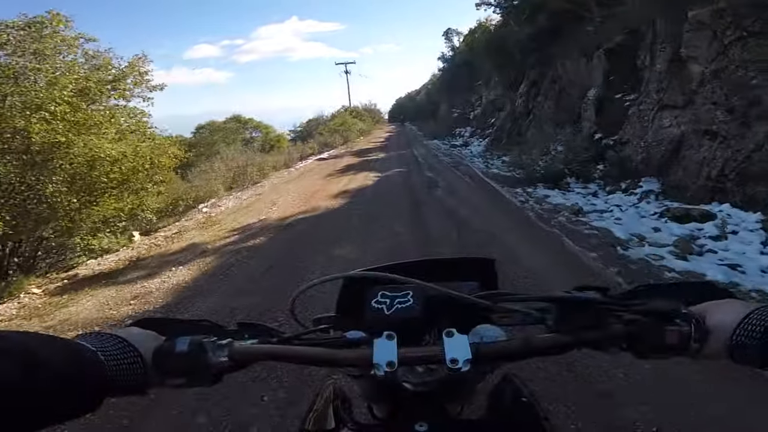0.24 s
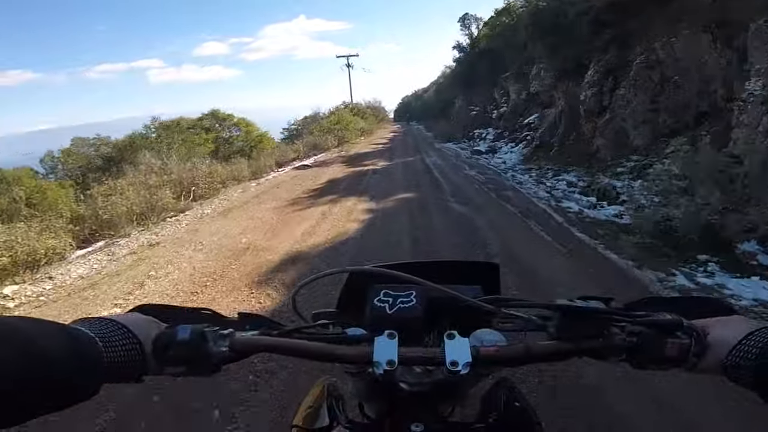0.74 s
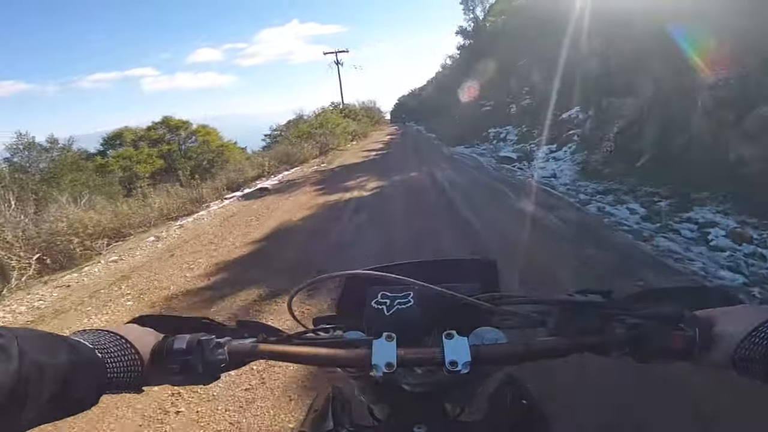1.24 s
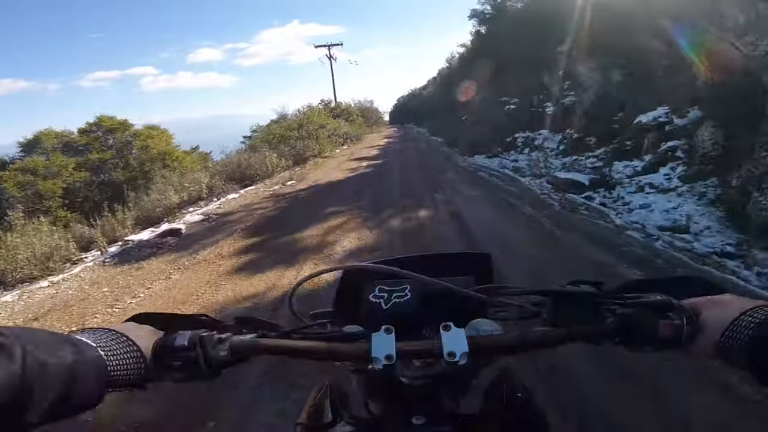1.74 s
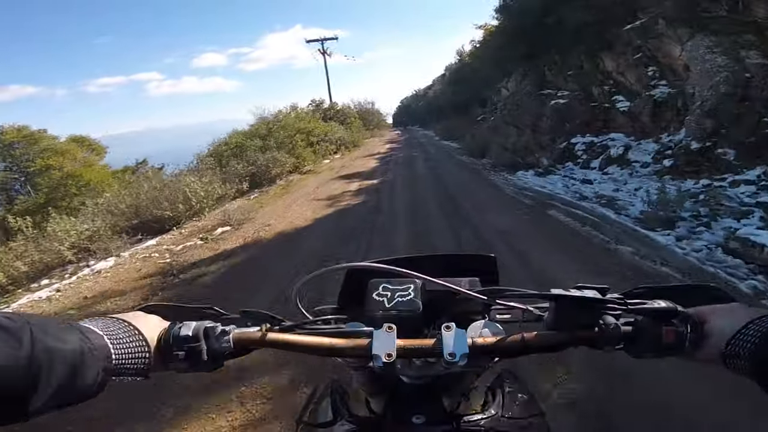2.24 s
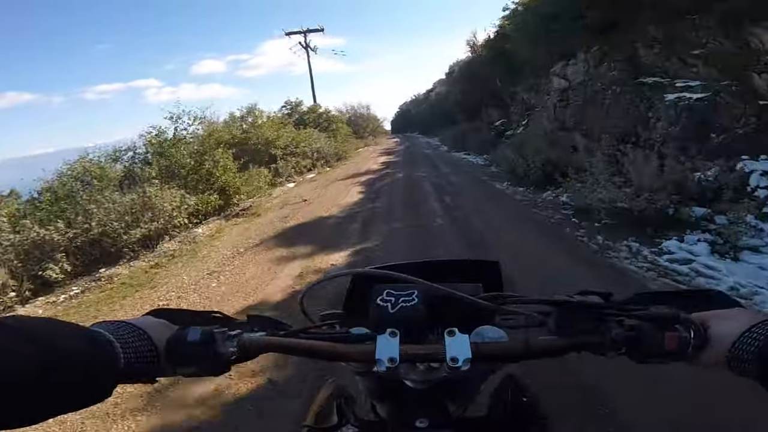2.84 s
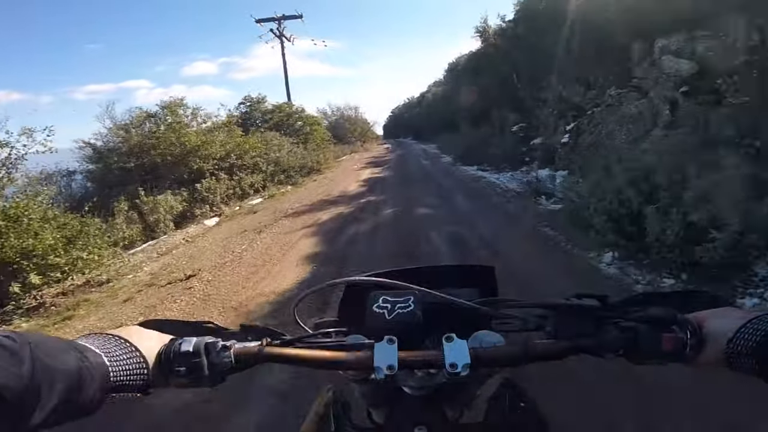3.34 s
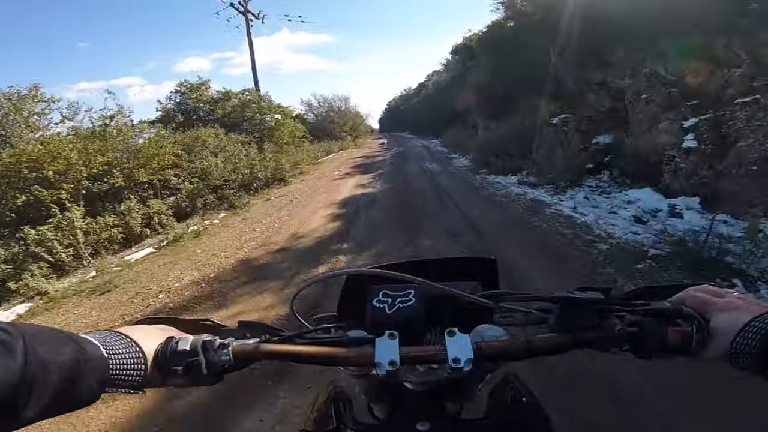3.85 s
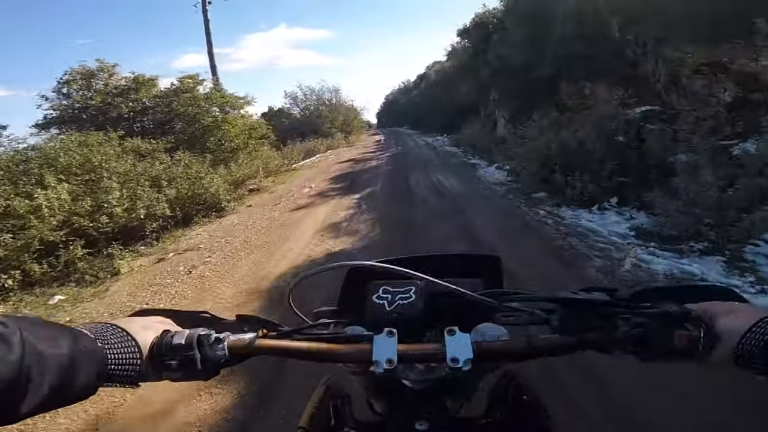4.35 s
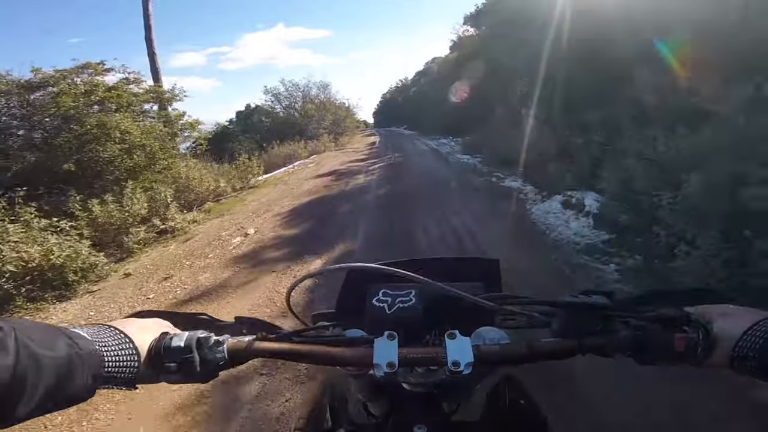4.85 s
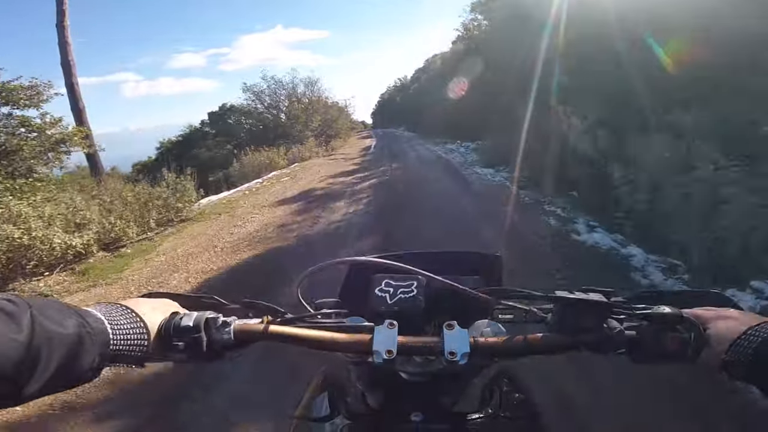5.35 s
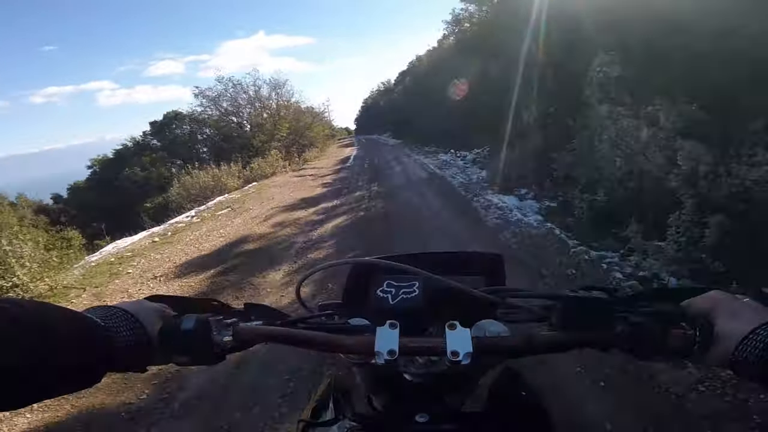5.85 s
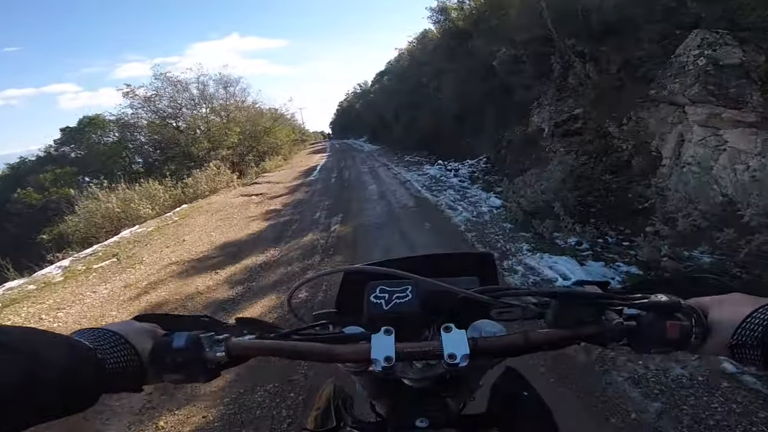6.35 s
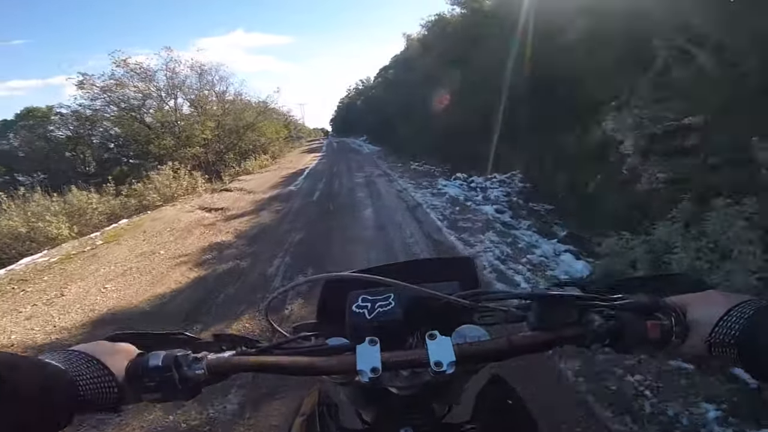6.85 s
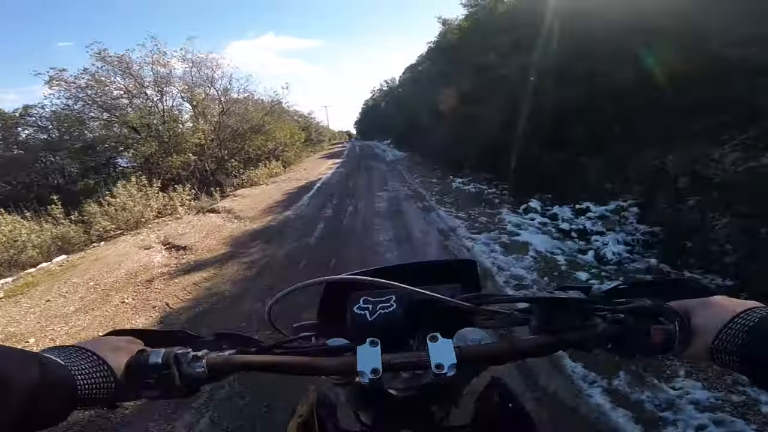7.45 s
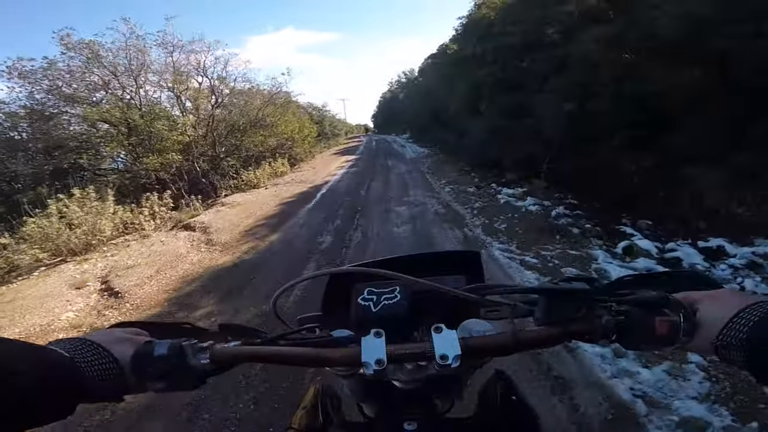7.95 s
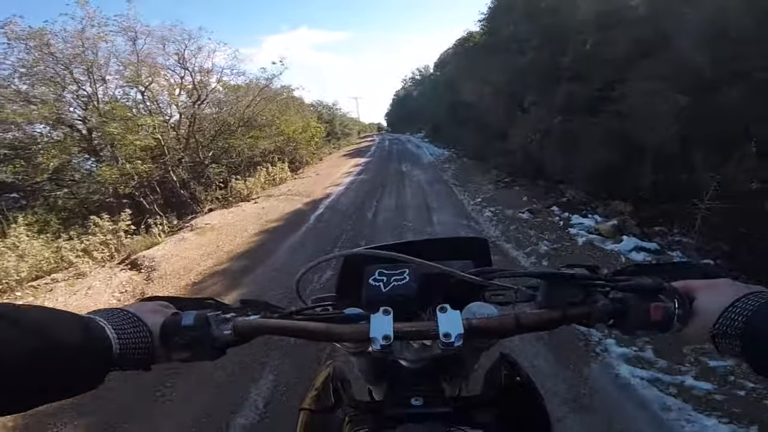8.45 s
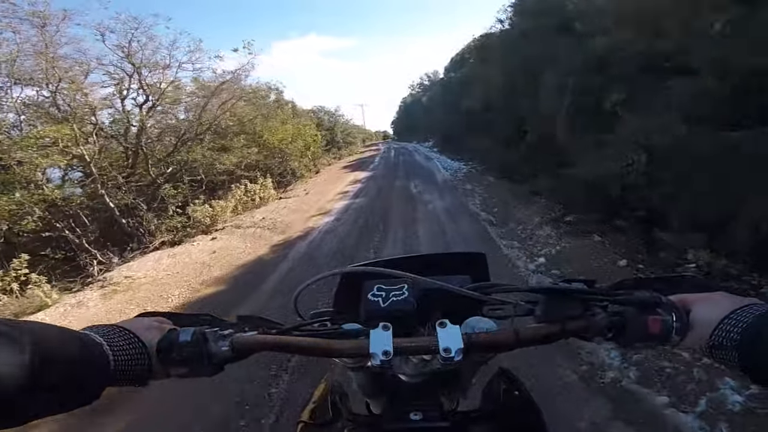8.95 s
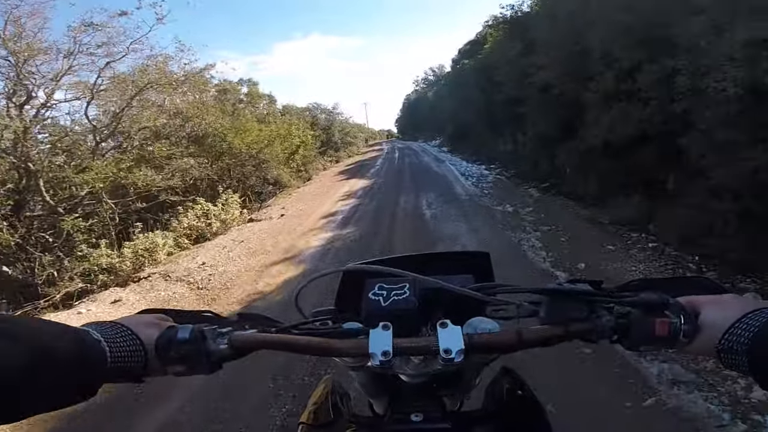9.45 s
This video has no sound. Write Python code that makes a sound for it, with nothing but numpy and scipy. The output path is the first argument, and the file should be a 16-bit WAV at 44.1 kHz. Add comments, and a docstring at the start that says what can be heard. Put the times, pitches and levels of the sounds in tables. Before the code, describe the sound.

A dirt bike on an open gravel road, heard from a microphone on the rider. Fast bassy exhaust thuds dominate, with dry mechanical clatter, hiss and low wind and tyre rumble beneath. Mid-way the engine sags to a slow irregular thump, chain slap and stone knocks appear, short bursts of throttle lift it, and it ends pulling strongly with brief metallic rattles.

```python
"""A four-stroke single dirt bike chugs along a gravel road at low revs, heard from on the rider.
Each firing booms as the silencer gas swings and, throttle open, barks in the pipe; off it, firing is uneven.
Noise shaped by the crank angle makes the exhaust rush, air box growl, machinery, cams and panel drone.
Gears whine as a modulated tone; impulses ring as valve ticks, chain slap and loose metal; short noise
bursts make the stones. Filtered noise makes the tyre and wind rumble; two limiters hold the peaks level."""
import sys
import numpy as np
from scipy import signal
from scipy.fft import rfft, irfft
from scipy.io import wavfile
from scipy.ndimage import uniform_filter1d, minimum_filter1d

SR = 44100
rng = np.random.default_rng(int(sys.argv[2]) if len(sys.argv) > 2 else 0)


def waveform_to_disk(signal):
    """Save audio, clipped to [-1, 1], as 16-bit WAV at the path in sys.argv[1]."""
    frames = np.transpose(np.atleast_2d(signal))
    scaled = np.clip(frames, -1, 1) * 32767
    samples = np.round(scaled).astype(np.int16)
    wavfile.write(sys.argv[1], SR, samples)


N = 428211
TIME = np.arange(N) / SR
CRUISE_RATE = 19  # firings per second, one per engine cycle
# engine speed: (time [s], rate [firings per second])
ENGINE_SPEED = [(0.0, 19.22), (0.25, 19.75), (0.52, 19.42), (0.83, 18.92), (1.3, 19.09), (1.55, 18.74),
                (1.8, 19.28), (2.93, 19.7), (3.24, 18.71), (3.88, 18.3), (4.53, 14.94), (5.16, 13.29),
                (5.68, 13.05), (6.15, 10.41), (6.41, 15.31), (6.84, 11.98), (7.11, 11.32), (7.58, 15.02),
                (7.99, 14.49), (8.26, 17.43), (8.42, 15.91), (9.71, 20.82)]
# throttle, as the strength of the firings before the bark's own gain: (time [s], level [dB])
THROTTLE_LEVEL = [(0.0, -8), (0.55, -14.5), (1.35, -11.5), (1.8, -4), (2.35, -2.5), (3.05, -3.5),
                  (3.25, -12.5), (3.9, -13.5), (5.05, -18.5), (5.55, -11), (6.02, -18), (6.38, -5.5),
                  (6.65, -15), (7.8, -11.5), (8.25, -3.5), (8.45, -5), (9.0, -2.5), (9.71, -2.5)]


def undb(db):
    """Decibels to gain."""
    return 10 ** (np.asarray(db) / 20)


def curves(table, at=TIME):
    """The columns of a table, joined by straight lines in time."""
    s, *columns = np.transpose(table)
    return [np.interp(at, s, column) for column in columns]


def unit(x):
    """Scale to rms 1."""
    return x / np.sqrt(np.mean(x ** 2))


def colour(x, spectrum):
    """Filter by (frequency [Hz], level [dB]) points; rms 1."""
    hz, db = np.transpose(spectrum)
    bins = np.maximum(np.arange(N // 2 + 1) * SR / N, 1)
    gain = undb(np.interp(np.log(bins), np.log(hz), db))
    return unit(irfft(rfft(x) * gain, N))


def band(x, lo_hz, hi_hz):
    """Keep one band."""
    return signal.sosfilt(signal.butter(3, [lo_hz, hi_hz], "bandpass", fs=SR, output="sos"), x)


def walk(rate):
    """Slow chance with a spread near 1, from smoothed steps at a rate in Hz."""
    step = int(SR / rate)
    steps = np.repeat(rng.standard_normal(N // step + 1), step)
    return unit(uniform_filter1d(steps, step)[:N])


def clicks(times, sizes):
    """One impulse at each time."""
    places = np.clip(np.asarray(times) * SR, 0, N).astype(int)
    return np.bincount(places, sizes, N + 1)[:N]


def ring(x, modes):
    """Drive a set of damped modes."""
    t = TIME[:SR // 2]
    response = sum(undb(db) * np.exp(-np.pi * width * t) * np.sin(2 * np.pi * hz * t)
                   for hz, width, db in modes)
    return signal.fftconvolve(x, response)[:N]


def bursts(times, sizes, decay_s):
    """Noise that jumps up at each time and dies away."""
    envelope = signal.lfilter([1], [1, -np.exp(-1 / (decay_s * SR))], clicks(times, sizes))
    return envelope * rng.standard_normal(N)


def add(out, start_s, sound):
    """Mix a sound in at a time."""
    i = min(max(int(start_s * SR), 0), N)
    out[i:i + len(sound)] += sound[:N - i]


def lobe(cycles, centre, width):
    """A smooth swell at one place in every engine cycle."""
    distance = (cycles - centre + .5) % 1 - .5
    return np.exp(-.5 * (distance / width) ** 2)


def tap(cycles, start, fade):
    """A sudden tap at one place in every engine cycle, dying away."""
    return np.exp(-((cycles - start) % 1) / fade)


def shake(cycles, repeat, size=1024):
    """Engine vibration: one share repeats with the crank angle, the rest is new in every cycle."""
    share = np.clip(repeat, 0, 1)
    pattern = np.interp(cycles % 1, np.linspace(0, 1, size), rng.standard_normal(size))
    return np.sqrt(share) * pattern + np.sqrt(1 - share) * rng.standard_normal(N)


def moments(cycles, place):
    """The times at which each engine cycle reaches one place."""
    return np.interp(np.arange(int(cycles[-1])) + place, cycles, TIME)


def octaves(at=TIME):
    """Engine speed in octaves above cruising."""
    return np.log2(curves(ENGINE_SPEED, at)[0] / CRUISE_RATE)


def opening(strength_db, shut_db=-13, wide_db=0.0):
    """How far the throttle is open, 0-1."""
    return np.clip((strength_db - shut_db) / (wide_db - shut_db), 0, 1)


def boom(times, hz=55.28, shut_glide_hz=10, open_glide_hz=54, glide_s=0.018, rise_s=0.0021,
         shut_width=8.1, open_width=6.3, shut_db=-3.5, open_db=-4.5, scatter_db=3.0,
         jitter_s=0.00045, puff=0.45, puff_s=0.0038, lag_s=0.0014, choke_s=0.016):
    """A puff sets the silencer gas swinging; throttle open, it starts higher and sinks; the next puff chokes it."""
    # slow cycles take in more gas, so each boom is bigger; far more so with the throttle open
    boom_db_per_octave, lug_db_per_octave = -4, -9
    out, t = np.zeros(N), TIME[:SR // 4]
    flows = opening(curves(THROTTLE_LEVEL, times)[0])
    charges_db = (boom_db_per_octave + flows * lug_db_per_octave) * octaves(times)
    periods = 1 / curves(ENGINE_SPEED, times)[0]
    luck = rng.standard_normal((len(times), 2))
    for s, period, flow, charge_db, (early, strong) in zip(times, periods, flows, charges_db, luck):
        uneven = 1 - flow  # a shut throttle burns less evenly
        glide_hz = shut_glide_hz + flow * (open_glide_hz - shut_glide_hz)
        turns = hz * t + glide_hz * glide_s * (1 - np.exp(-t / glide_s))
        width = shut_width + flow * (open_width - shut_width)
        level_db = shut_db + flow * (open_db - shut_db) + charge_db + scatter_db * uneven * strong
        size = undb(level_db)
        swing = (1 - np.exp(-t / rise_s)) * np.exp(-np.pi * width * t) * np.sin(2 * np.pi * turns)
        swing = swing * np.exp(-np.maximum(t - period, 0) / choke_s)
        start = s + uneven * (lag_s - jitter_s * early)
        push = np.sin(np.pi * np.minimum(t / puff_s, 1)) ** 2
        add(out, start - puff_s, size * uneven * puff * push)
        add(out, start, -size * swing)
    return out


def firings(times, scatter_db=1.9, rebound=0.39):
    """Times and strengths of the barks: shut throttle scatters them more, and weak ones tend to precede strong."""
    # single firings that catch out of step: (time [s], level [dB])
    bangs = [(0.046, -6.5), (0.25, -9), (0.46, -10), (0.665, -7), (1.035, -11), (1.246, -1), (1.562, -6.5),
             (3.162, -6.5), (3.272, -7.5), (3.379, -7.5), (3.429, -7.5), (3.536, -9), (3.595, -9),
             (3.699, -10.5), (3.751, -12.5), (3.915, -5), (3.975, -11.5), (4.146, -5.5), (4.208, -8.5),
             (4.332, -10), (4.724, -5), (4.94, -15), (5.16, -12.5), (5.383, -13.5), (5.614, -10.5),
             (5.77, -10.5), (5.85, -10.5), (6.208, -12), (6.711, -7.5), (7.373, -6), (7.447, -8),
             (7.583, -7)]
    times, strength_db = times.copy(), curves(THROTTLE_LEVEL, times)[0]
    luck = rng.standard_normal(len(times))
    swings = luck - rebound * np.roll(luck, 1)
    strength_db = strength_db + scatter_db * swings * (1.5 - opening(strength_db))
    for s, db in bangs:
        nearest = np.argmin(abs(times - s))
        times[nearest], strength_db[nearest] = s, db
    return times, strength_db


def bark(times, strength_db, push_s=0.0033, db=4):
    """The exhaust valve lets out a rounded push of gas that rings the pipe."""
    # exhaust pipe modes: (frequency [Hz], width [Hz], relative level [dB])
    pipe = [(125, 16, -21), (243.7, 32.3, -4.5), (273, 35.6, -2.5), (318, 49, -12.5), (463, 50, -15.5)]
    push = np.sin(np.pi * np.minimum(TIME[:SR // 100] / push_s, 1)) ** 2
    impulses = clicks(times - push_s / 2, undb(strength_db + db))
    pulses = signal.fftconvolve(impulses, push / push.sum())[:N]
    return ring(pulses, pipe)


def rush(cycles, load, db=-31.5, load_db=5.0):
    """Spent gas tumbles out of the pipe: low noise that swells and fades once a cycle, louder under load."""
    eddies = shake(cycles, repeat=0.6)
    gusts = band(eddies, 145.6, 330) * lobe(cycles, centre=0.23, width=0.2)
    return unit(gusts) * undb(db + load_db * load)


def growl(cycles, revs, load, db=-41.0, db_per_octave=9, load_db=4.5):
    """The air box growls twice in every cycle, most when the engine pulls at speed."""
    # resonances of the air box: (frequency [Hz], width [Hz], relative level [dB])
    airbox = [(502, 66, 3.5), (630, 84, 3.5), (711, 80, 2)]
    gulps = lobe(cycles, centre=0.27, width=0.052) + 0.73 * lobe(cycles, centre=0.622, width=0.064)
    air = band(shake(cycles, repeat=0.26) * gulps, 416, 864)
    return unit(ring(air, airbox)) * undb(db + db_per_octave * revs + load_db * load)


def machinery(cycles, case_db, hiss_db, barrel_db):
    """The piston slaps the barrel after each firing; the valve gear hisses twice a cycle."""
    # spectrum of the engine cases: (frequency [Hz], relative level [dB])
    case_spectrum = [(500, -6.5), (900, -2.5), (1100, -2), (1220, -3.5), (1310, 0.5), (1400, -12.5),
                     (1520, -5), (1660, -5.5), (1900, -12.5), (2250, -8), (2700, -13.5), (3300, -18),
                     (3700, -18), (6000, -20), (12000, -82)]
    # spectrum of the hiss as recorded, with the recorder's step down above 11 kHz:
    # (frequency [Hz], relative level [dB])
    hiss_spectrum = [(1500, -18), (3350, 2), (3750, -12), (4100, -3), (4600, -1.5), (5150, 3), (6400, -0.5),
                     (7300, -4.5), (7900, -2.5), (8600, -4), (10300, -6), (11200, -14.5), (12000, -27.5),
                     (13600, -14.5), (15000, -38)]
    # ring of the cylinder barrel: (frequency [Hz], width [Hz], relative level [dB])
    barrel_modes = [(1247, 28, 4.5), (1399, 50, 9.5), (1550, 72, 1.5), (1663, 85, 2)]
    exhaust, intake = tap(cycles, start=0.25, fade=0.11), tap(cycles, start=0.63, fade=0.025)
    slap, chain = lobe(cycles, centre=0.19, width=0.083), lobe(cycles, centre=0.65, width=0.069)
    gritty = rng.standard_normal(N) * undb(1.9 * walk(700) + 1.0 * walk(25))
    hiss = colour(gritty * (0.63 + 1.23 * exhaust + 0.49 * intake + 0.49 * chain), hiss_spectrum)
    case_shake = shake(cycles, repeat=0.067) * (1 + 0.075 * slap)
    cases = colour(case_shake * undb(1.17 * walk(90)), case_spectrum)
    barrel = unit(ring(shake(cycles, repeat=0.051) * (0.17 + slap + 0.47 * chain), barrel_modes))
    clatter = (cases + barrel * undb(barrel_db)) * undb(case_db)
    return hiss * undb(hiss_db) + clatter


def valves(cycles, revs, tick_db, scatter_db=2.5, jitter_s=0.0003):
    """The intake valve seats and rebounds, ringing the head; engine speed shifts the balance of its modes."""
    # ring of the head: (frequency [Hz], width [Hz], relative level [dB], change with speed [dB per octave])
    head = [(4023, 38, 3, 3.5), (4290, 63, 1, -8), (4385, 65, -3.5, -6.5), (4600, 120, -8, -6),
            (5060, 42, 0.5, 8)]
    # ticks of the intake valve: (place in the cycle [0-1], relative level [dB])
    tick_places = [(0.555, 3.5), (0.6, 0), (0.68, -5.5)]
    times = np.concatenate([moments(cycles, place) for place, db in tick_places])
    luck, late = rng.standard_normal((len(times), 2)).T
    levels_db = np.repeat([db for place, db in tick_places], int(cycles[-1]))
    ticks = clicks(times + jitter_s * late, undb(levels_db + scatter_db * luck))
    rung = sum(ring(ticks, [mode]) * undb(db_per_octave * revs) for *mode, db_per_octave in head)
    return unit(rung) * undb(tick_db)


def cams(cycles, cover_db):
    """The two cam lobes rub their rockers in turn and make the valve cover sing."""
    # ring of the valve cover: (frequency [Hz], width [Hz], relative level [dB])
    cover = [(2610, 39, 0), (2780, 35, -1.5), (2840, 34, -1.5), (5400, 98, -7), (6750, 93, -0.5),
             (7930, 110, 1)]
    lift = 0.59 + lobe(cycles, centre=0.27, width=0.066) + 0.8 * lobe(cycles, centre=0.71, width=0.047)
    rubbing = shake(cycles, repeat=0.25)
    return unit(ring(rubbing * lift, cover)) * undb(cover_db)


def gears(cycles, load, teeth=62, db=-60.5, ring_db=-48.0, load_db=0.0, flutter_db=1.1):
    """Meshing teeth, loaded twice a cycle, whine, and the case sings along when they near its modes."""
    # modes of the gear case: (frequency [Hz], width [Hz], relative level [dB])
    gear_case = [(846, 94, 0), (1226, 46, -2.5)]
    # the crank speeds up and slows within each cycle, and wanders a little
    turn = cycles + 0.012 * np.sin(2 * np.pi * cycles) / (2 * np.pi) + 0.0009 * walk(30)
    pressure = 0.35 + lobe(cycles, centre=0.19, width=0.094) + lobe(cycles, centre=0.83, width=0.17)
    flutter = undb(flutter_db * walk(20) + 1.0 * walk(4.2))
    mesh = unit(np.sin(2 * np.pi * teeth * turn) * pressure * flutter)
    return mesh * undb(db) + unit(ring(mesh, gear_case)) * undb(ring_db + load_db * load)


def chain_slap(middle_s=6.08, half_s=0.42, db=-38.5, scatter_db=1.2):
    """For one stretch the slack chain drums on its guide at a slowly rising rate, swelling and fading."""
    # modes of the chain guide: (frequency [Hz], width [Hz], relative level [dB])
    guide = [(452, 19, 3), (530, 41, 1), (590, 46, -16)]
    middle_rate, rise_per_s = 41.3, 2.2  # knocks per second at the middle, and how fast that rises
    rate = middle_rate + rise_per_s * (TIME - middle_s) + 0.15 * walk(10)
    times = moments(np.cumsum(rate) / SR, 0)
    hits = clicks(times, undb(scatter_db * rng.standard_normal(len(times))))
    knocks = ring(band(hits, 340, 1100), guide)
    return unit(knocks) * np.exp(-((TIME - middle_s) / half_s) ** 2) * undb(db)


def drone(cycles):
    """The engine shakes the panels, swelling twice a cycle: just after the firing and a third of a cycle on."""
    # modes of the tank and side panels: (frequency [Hz], width [Hz], relative level [dB])
    panels = [(463, 49, 9.5), (508, 34, -1)]
    # course of the drone, before a fixed trim: (time [s], level [dB])
    drone_level = [(0.0, -32), (1.1, -34.5), (1.6, -29), (3.0, -28), (4.6, -36), (5.6, -32.5), (6.15, -29),
                   (6.5, -31), (6.75, -49), (7.8, -48), (8.7, -48), (9.3, -27), (9.71, -28.5)]
    jolts = 0.59 + lobe(cycles, centre=0.027, width=0.07) + 0.7 * lobe(cycles, centre=0.33, width=0.055)
    vibration = shake(cycles, repeat=0.7)
    hum = unit(ring(band(vibration * jolts, 377, 770), panels))
    return hum * undb(curves(drone_level)[0] - 3.5)


def rattles():
    """Jolts make loose metal chatter and ring; stones knock on the frame as short bursts of noise."""
    # jolts: (time [s], relative level [dB], ring relative to that [dB])
    jolts = [(0.0717, -43, -18), (0.158, -40, -21), (0.2079, -45, -14), (3.1887, -43, -19),
             (3.4386, -40, -21), (4.071, -40, -19), (4.6214, -42, -21), (6.1275, -43, -26),
             (9.2549, -41, -8), (9.289, -37, -15), (9.3144, -45, -10), (9.5786, -42, -15)]
    # modes of the loose metal: (frequency [Hz], width [Hz], relative level [dB])
    metal_modes = [(9947, 22, 0), (10334, 24, -2), (13667, 30, -14), (14052, 26, -15)]
    # stones: (time [s], relative level [dB], decay [s])
    stones = [(1.064, -25, .004), (3.063, -23, .004), (3.645, -26, .02), (4.186, -25, .005),
              (5.873, -25, .005), (6.125, -33, .03), (6.197, -27, .004), (6.221, -23.5, .007),
              (6.272, -29, .008), (6.392, -32, .03)]
    s, db, ring_db = np.transpose(jolts)
    bright = signal.butter(2, [5500, 10500], "bandpass", fs=SR, output="sos")
    chatter = signal.sosfilt(bright, bursts(s, undb(db + 5.5), decay_s=0.019))
    metal = ring(clicks(s, undb(db + ring_db + 11.5)), metal_modes)
    grit = sum(bursts([at], undb([stone_db + 6]), decay_s) for at, stone_db, decay_s in stones)
    knocks = band(grit, 600, 1900)
    return chatter + metal + knocks


def road(road_db):
    """Tyres rumble over gravel, with wind buffeting underneath: one coloured noise of wavering level."""
    # spectrum of the rumble: (frequency [Hz], relative level [dB])
    road_spectrum = [(20, 2), (42, 11), (100, 3), (150, -5), (290, -8), (385, -16.5), (470, -13.5),
                     (620, -18.5), (800, -22), (1100, -38.5), (2000, -37), (5000, -71), (15000, -87)]
    return colour(rng.standard_normal(N) * undb(2.06 * walk(30)), road_spectrum) * undb(road_db)


def swells():
    """Level changes in dB, rounded in time, where the clatter, hiss and barrel ring swell or sink."""
    # swells and sinks: (middle [s], half length [s], clatter [dB], hiss [dB], ring of the barrel [dB])
    changes = [(0.143, 0.39, 1.5, 2, 4), (3.503, 0.25, 4.5, 2.5, -6), (4.7, 0.87, 3.5, 1, -3),
               (6.085, 0.3, 4.5, 4.5, -6.5), (6.38, 0.09, -0.5, -2, 4.5)]
    return sum(np.outer(change_db, np.exp(-((TIME - s) / half_s) ** 2))
               for s, half_s, *change_db in changes)


def scene():
    """The crank's turning times the engine's sounds; speed, throttle and set swells move many of the levels."""
    # valve gear: (time [s], level of the ticks [dB], level of the cover's ring [dB])
    valve_gear = [(0.0, -62, -49.5), (1.2, -58, -54), (2.2, -57, -48.5), (3.2, -54, -49.5), (3.8, -60, -53),
                  (4.4, -59, -51), (5.1, -55, -52), (7.0, -56.5, -54.5), (7.8, -54, -51), (8.6, -51, -47.5),
                  (9.71, -57, -51)]
    # levels at cruising speed (dB), their rise with engine speed (dB per octave) and at full throttle (dB)
    road_db, road_db_per_octave = -18.5, 1.0
    cases_db, cases_db_per_octave, cases_load_db = -39.5, 8.5, 1.3
    valves_db, valves_db_per_octave, valves_load_db = -46.5, 7.5, 2.5
    cycles = np.cumsum(curves(ENGINE_SPEED)[0]) / SR
    strokes = np.interp(np.arange(1, int(cycles[-1]) + 1), cycles, TIME)
    revs, load = octaves(), opening(curves(THROTTLE_LEVEL)[0])
    swell_case_db, swell_hiss_db, swell_ring_db = swells()
    case_db = cases_db + cases_db_per_octave * revs + cases_load_db * load + swell_case_db
    hiss_db = valves_db + valves_db_per_octave * revs + valves_load_db * load + swell_hiss_db
    tick_db, cover_db = curves(valve_gear)
    exhaust = boom(np.append(0, strokes)) + bark(*firings(strokes)) + rush(cycles, load)
    intake = growl(cycles, revs, load)
    metalwork = machinery(cycles, case_db, hiss_db, barrel_db=swell_ring_db - 4)
    metalwork += valves(cycles, revs, tick_db) + cams(cycles, cover_db)
    metalwork += gears(cycles, load) + chain_slap()
    tyres = road(road_db + road_db_per_octave * revs)
    return (exhaust + intake + metalwork + drone(cycles) + rattles() + tyres)[None]


def limit(x, ceiling, hold_s):
    """Turn the gain down around each peak over the ceiling."""
    hold = int(hold_s * SR)
    gain = ceiling / np.maximum(abs(x), ceiling)
    return x * uniform_filter1d(minimum_filter1d(gain, hold), hold)


def record(dry):
    """One limiter holds the bass, another the whole; the microphone dulls the highest treble and the top is cut."""
    bass = signal.sosfiltfilt(signal.butter(3, 110, fs=SR, output="sos"), dry)
    bass_held = dry - bass + limit(bass, ceiling=0.52, hold_s=0.016)
    held = limit(bass_held, ceiling=0.9, hold_s=0.008)
    dulled = signal.sosfilt(signal.butter(2, [4, 13000], "bandpass", fs=SR, output="sos"), held)
    top_hz = 15300
    return signal.sosfilt(signal.ellip(8, .2, 70, top_hz, fs=SR, output="sos"), dulled)


dry = scene()
out = record(dry)
waveform_to_disk(out)
```